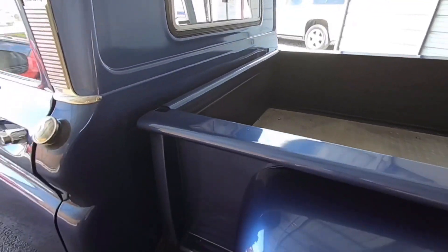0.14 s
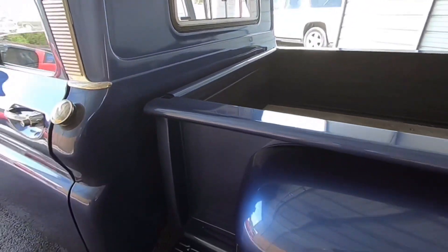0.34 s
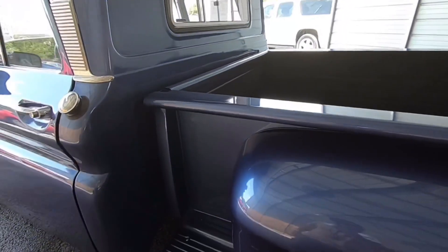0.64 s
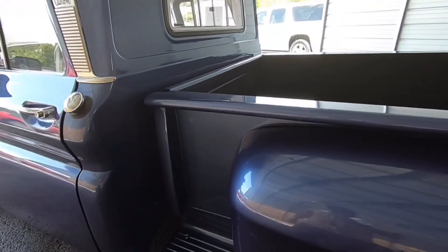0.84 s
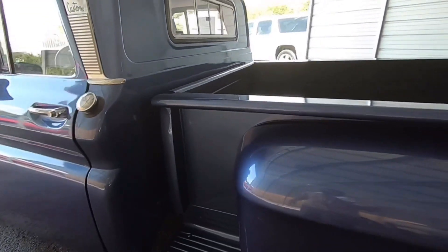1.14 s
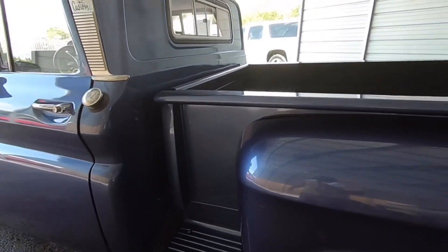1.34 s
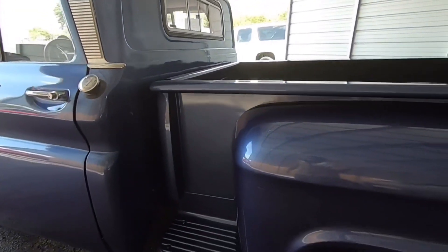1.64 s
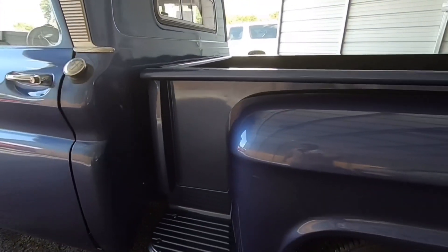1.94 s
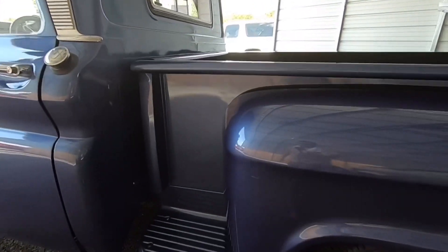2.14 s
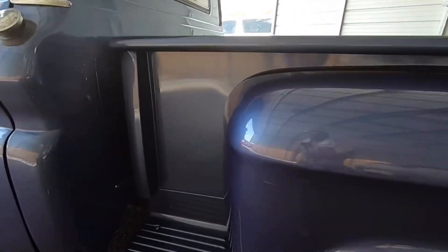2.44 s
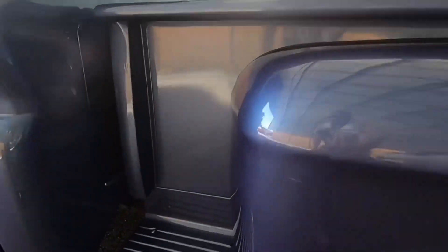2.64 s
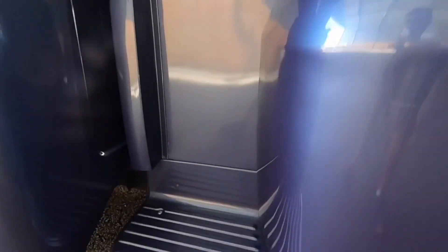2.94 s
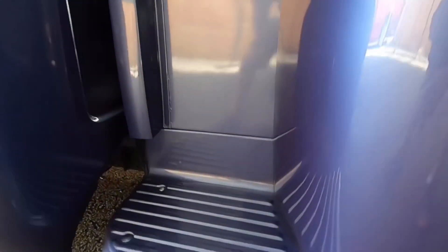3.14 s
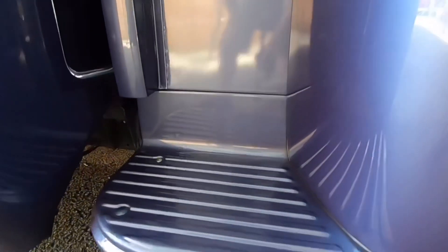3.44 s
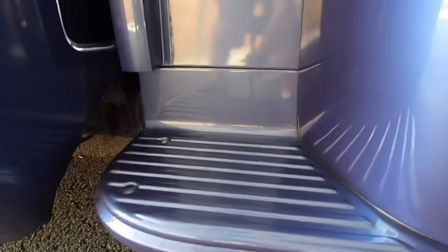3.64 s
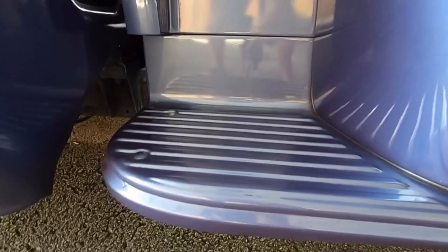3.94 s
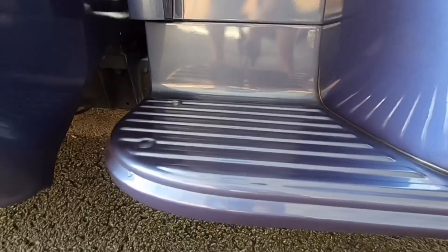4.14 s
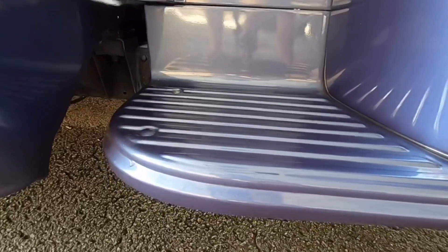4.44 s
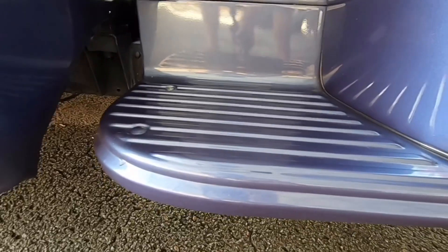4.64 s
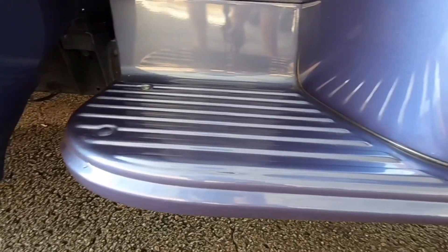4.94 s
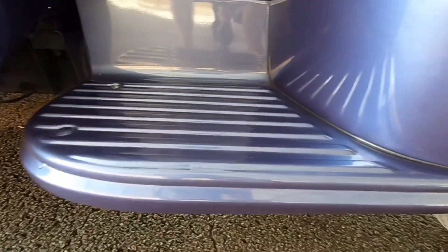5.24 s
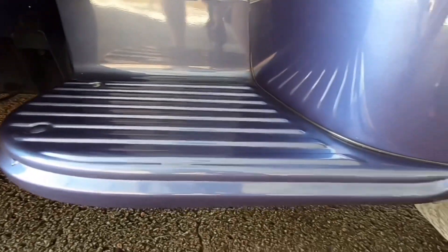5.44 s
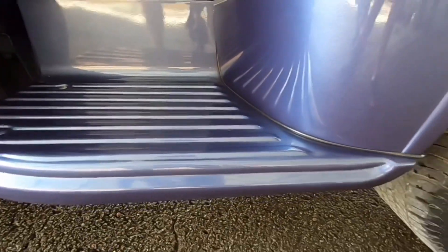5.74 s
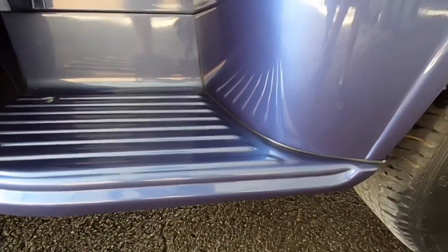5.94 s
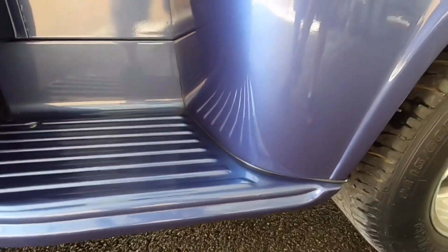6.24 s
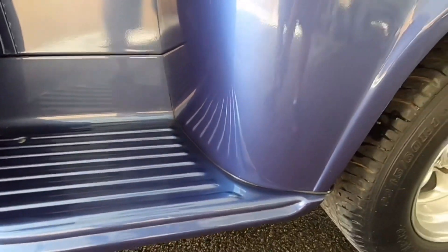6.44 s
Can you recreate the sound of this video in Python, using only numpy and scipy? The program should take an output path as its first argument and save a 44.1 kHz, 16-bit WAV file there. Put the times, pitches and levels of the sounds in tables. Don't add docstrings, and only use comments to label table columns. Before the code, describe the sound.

Hand-held in a covered lot, the sound begins with close, low wind puffs thudding on the microphone for about 0.6 seconds over subdued rushing air. At 0.73 a metallic latch clacks and bounces, its hollow tube ringing. At 1.05 to 1.16 a heavy door slams far off: a quick cluster of blows, loudest near 1.08, with a deep panel boom, loose rattles and a dense roof echo fading by about 2 seconds. Then mains hum around 60 hertz grows, strongest near 5, dipping and swelling as the camera sways. Two fans hold a tone near 295 hertz, beating about eleven times a second, amid steady airy rush and softer gusts. Faint knocks come at 2.5 to 3.1 and 6.2, tiny grit ticks at 2.7 to 3.3. From 5.4 the treble gradually opens and the mono image widens, with low gusts differing left and right until 6.6.

```python
import sys
import numpy as np
from scipy import signal
from scipy.fft import rfft, irfft
from scipy.io import wavfile
from scipy.ndimage import uniform_filter1d

SR = 44100
rng = np.random.default_rng(int(sys.argv[2]) if len(sys.argv) > 2 else 0)


def invert_db(level):
    return 10 ** (np.asarray(level, dtype=float) / 20)


def wrap_up_sound(samples):
    columns = np.atleast_2d(samples).T
    tamed = np.clip(columns, -1, 1)
    steps = np.round(tamed * 32767).astype(np.int16)
    wavfile.write(sys.argv[1], SR, steps)


N = 290343
TIME = np.arange(N) / SR
SHORT = TIME[:2 ** 15]

# t/s, level/dB, tilt about 1 kHz [dB per octave]
SLAM_BLOWS = [
    (1.048, -19, 4),
    (1.059, -7.5, 4),
    (1.064, -4.5, 1),
    (1.076, -4, -4),
    (1.079, -2.5, 2),
    (1.108, -5, -1.5),
    (1.13, -8, -5),
    (1.161, -11.5, 3),
]
# f/Hz, level/dB per Hz
DOOR_COLOUR = [(25, -36), (50, -7), (100, -3), (250, -3.5), (400, -7.5), (900, -11), (1700, -14.5),
               (2700, -25.5), (4600, -36), (8200, -40), (9600, -55), (11500, -49), (14000, -75),
               (15500, -95)]
# f/Hz, level/dB, t60/s, build-up/s
PANEL_MODES = [(46.8, -4, 0.7, 0.025), (85.6, 2.5, 0.6, 0.019), (100.5, -5, 0.56, .02),
               (125.5, -5, 0.55, 0.031), (156.4, -6, 0.45, 0.011), (175.3, -5.5, 0.45, 0.012),
               (241.3, -2, 0.77, .05), (328.6, -5, 0.51, 0.04), (467, -10, 0.56, 0.02),
               (613, -10.5, 0.52, 0.012), (1160, -22, 0.5, .01), (1396, -13, 0.33, 0.0045),
               (1615, -14, 0.4, 0.0071), (1806, -15, 0.56, 0.0092)]
# f/Hz, t60/s
ROOF_DECAY = [(40, 0.7), (150, 0.6), (300, 0.86), (1000, 0.73), (4000, 0.67), (8000, 0.41), (14000, .5)]
# t/s, level/dB, tilt about 1 kHz [dB per octave]
LATCH_BLOWS = [
    (.726, -3.5, 1.2),
    (.733, -0.5, 0.3),
    (.755, 0.5, -0.5),
    (.83, -2.5, 0.029),
    (.91, -7, -0.13),
]
# f/Hz, level/dB, t60/s
LATCH_MODES = [(520, 0.5, 0.47), (540, -2.5, 0.67), (590, -13, 0.44), (716, -17, .5), (888, -11, .6),
               (1080, -6.5, 1), (1113, 1, 0.57), (1300, -2, 0.22)]
# f/Hz, level/dB per Hz
LATCH_COLOUR = [(350, -11), (520, 12.5), (700, 8), (900, 9), (1300, 4), (3000, -1), (5000, -6.5),
                (8300, -33), (9200, -42), (11500, -45), (15000, -77)]
# t/s, peak level/dB, f/Hz, t60/s
RATTLES = [(.73, -31, 797, .15), (.815, -34, 1047, .2), (.83, -33, 562, .15), (.95, -35, 1090, .4),
           (.96, -35, 715, .15), (1.02, -30, 857, .2), (1.057, -25, 978, .35), (1.057, -24, 1405, .1),
           (1.059, -23, 1770, .1), (1.079, -14.5, 1402, .15), (1.079, -20, 1765, .17),
           (1.081, -44, 8300, .06), (1.081, -37, 6860, .06), (1.095, -20, 630, .2), (1.11, -25, 1160, .15),
           (1.08, -27, 2270, .15), (1.09, -27, 2040, .2), (1.1, -34, 2690, .2), (1.085, -30, 3090, .15),
           (1.12, -20, 1360, 0.18), (1.105, -23, 450, .25), (1.2, -27, 1400, .15), (1.165, -17, 250, .2),
           (1.17, -19, 330, .2), (1.275, -20, 235, .1), (1.22, -20, 421, 0.14), (1.268, -32, 1780, .1),
           (1.288, -28, 1800, .08), (1.311, -30, 960, .15), (1.345, -36, 1677, .15)]
# t/s, peak level/dB, f/Hz, t60/s
KNOCKS = [
    (2.53, -32, 825, 0.2),
    (2.56, -30, 850, 0.15),
    (2.715, -27, 674, .12),
    (2.875, -32, 965, 0.16),
    (2.88, -33, 900, .2),
    (3.125, -31, 1365, 0.099),
    (6.165, -35, 1057, 0.22),
]

# t/s, deep level/dB, upper level/dB, length/s
WIND_GUSTS = [(0, -25, -33, .06), (.1, -45, -28, 0.058), (.25, -33, -25.5, 0.11), (.36, -39, -20.5, 0.067),
              (.48, -31, -29, 0.049), (2.09, -26, -38, 0.086), (2.6, -24, -34, .1), (3.02, -42, -30.5, .08),
              (3.28, -33, -45, .08), (3.42, -40, -30, 0.044), (3.72, -38, -31.5, 0.065),
              (3.88, -31, -31.5, .07), (4.04, -45, -40, .04), (4.35, -33, -37, 0.065),
              (4.85, -27.5, -36, .07), (5.1, -34, -32, 0.22), (5.52, -47, -31, .05), (5.75, -33, -50, .05),
              (5.98, -32, -36, .05), (6.17, -29, -35, 0.07), (6.25, -33, -42, .05)]
# t/s, peak level/dB, f/Hz, push +1
PUFFS = [(.005, -17.5, 90, 1), (0.025, -12.5, 145, 1), (0.035, -18, 110, 1), (.059, -23, 60, 1),
         (0.092, -19, 110, -1), (.121, -23, 45, 1), (.156, -24, 90, 1), (.175, -20, 70, 1),
         (.19, -21, 85, 1), (.204, -25, 75, 1), (.221, -24, 55, 1), (0.261, -13.5, 62, -1),
         (.288, -22, 95, -1), (0.304, -14.5, 90, 1), (0.322, -15, 85, 1), (.327, -18, 80, -1),
         (.358, -8.5, 97, -1), (.376, -15, 90, 1), (0.382, -12.5, 99, -1), (.411, -20, 90, -1),
         (.435, -7.5, 90, 1), (.472, -12, 65, 1), (0.491, -12.5, 67, -1), (.503, -18, 70, 1),
         (.569, -25, 80, 1), (.585, -24, 70, -1), (.604, -23, 55, 1), (.656, -22, 70, 1),
         (.703, -18.5, 85, 1), (.731, -24, 55, -1), (1.0865, -10, 200, 1), (1.09, -8, 130, -1),
         (1.108, -12, 120, -1), (1.136, -10, 90, 1), (1.161, -13, 110, 1), (1.287, -12, 75, -1)]
# f/Hz, level/dB per Hz
DEEP_WIND_COLOUR = [(12, -30), (25, 16.0), (45, 11.0), (53, 16), (62, -8.0), (80, -49.5), (300, -110)]
UPPER_WIND_COLOUR = [(55, -25.0), (70, 13.5), (110, 5), (170, -3.5), (330, -22.0), (700, -59.5), (2000, -110)]
FLUTTER_COLOUR = [(120, -30), (200, -0.5), (380, -5.5), (520, -27), (1500, -80)]
# t/s, change/dB, length/s
LULL = [(.8, -7.5, .3)]

# t/s, fast fan level/dB, slow fan level/dB
FAN_LEVELS = [(0, -49, -49.5), (.45, -58, -49.5), (.8, -52, -43.5), (1.0, -36.5, -37.5), (1.6, -36.5, -44),
              (2.22, -32, -40), (2.95, -48, -37), (3.3, -31, -36), (3.5, -28, -47), (3.71, -33, -31.5),
              (4.3, -30.5, -38.5), (4.8, -42, -40), (5.0, -28.5, -43), (5.25, -38.5, -36), (5.5, -35, -44),
              (5.75, -37.5, -40.5), (6.3, -36, -41), (6.58, -31.5, -39)]
FAST_HZ, SLOW_HZ = 74.97, 72.27
# multiple, fast fan level/dB, slow fan level/dB
BLADES = [(3, -50.5, -57.5), (5, -50.5, -51.5), (6, -48.5, -58), (7, -54, -46.5), (8, -52, -51.5),
          (9, -47.5, -55), (10, -61.5, -51.5), (11, -60, -59), (12, -56, -61), (13, -62, -68.5),
          (14, -53.5, -62.5)]
# t/s, change/dB, length/s
LOW_PAIR_CRESTS = [
    (1.1, 6, .4),
    (2.0, 5, 0.48),
    (2.95, 14, 0.43),
    (4.85, 8, .25),
]
# t/s, f/Hz, level/dB, length/s
STREAKS = [(1.93, 505, -50, 0.35), (2.4, 505, -43, 0.24), (3.01, 505, -46.5, 0.28), (3.48, 505, -47.5, .2),
           (4.28, 505, -52.5, .3), (6.4, 505, -54, .25), (2.2, 450, -46, .3), (2.83, 450, -48.5, .3),
           (3.6, 450, -51.5, .3), (2.55, 525, -50, .2), (4.8, 525, -50.5, .15), (5.72, 525, -51.5, 0.33),
           (6.42, 525, -51, .25), (3.3, 577, -47.5, .25), (5.2, 577, -52, .3), (3.0, 600, -45, 0.16),
           (3.75, 600, -48, 0.23), (6.45, 600, -49.5, 0.14), (2.7, 675, -48.5, .45), (3.75, 675, -48, .25),
           (4.24, 675, -48, 0.22), (5.4, 730, -51, 0.28), (6.2, 675, -51, 0.36), (2.0, 900, -52, 0.38),
           (2.9, 1100, -48.5, .3), (3.33, 361, -45.5, .2), (5.2, 361, -49, .45), (5.97, 361, -49.5, 0.27),
           (2.7, 375, -50, 0.33), (4.84, 375, -45.5, 0.26), (5.4, 375, -45, .22), (6.0, 375, -49.5, 0.18),
           (3.6, 225, -42, .15), (4.5, 225, -43, .15), (3.3, 794, -52, .2), (3.2, 866, -52, .2),
           (4.1, 650, -49.5, .25), (2.7, 650, -50, 0.17), (2.4, 660, -53, .2), (4.7, 722, -51, .2),
           (2.8, 240, -46.5, .5), (4.4, 240, -49.5, .5), (2.4, 433, -54, .4), (6.2, 433, -53.5, .3)]

# t/s, level/dB
HUM_LEVEL = [(0, -34), (.25, -39), (.55, -34), (.9, -38.5), (1.5, -30.5), (2.1, -25.5), (2.9, -29.5),
             (3.6, -25.5), (5.0, -21.5), (6.05, -24), (6.58, -26.5)]
HUM_HZ = 60.0
# t/s, change/dB, length/s
SWAYS = [(2.42, 7.5, 0.076), (2.61, 6.5, 0.06), (3.0, 4, 0.072), (3.28, 2, 0.057), (3.4, -8, 0.058),
         (3.78, 7, 0.08), (3.98, 3.5, 0.11), (4.12, -9, 0.062), (4.4, 7.5, 0.06), (4.55, -5, 0.13),
         (4.94, 3, .15), (5.17, -2.5, 0.071), (5.36, 2.5, 0.094), (5.68, -5.5, 0.11), (6.0, 3, 0.14),
         (6.14, -16, 0.042), (6.25, -6, 0.14)]
# t/s, level/dB
SECOND_LEVEL = [(1.6, -48), (1.88, -43), (1.95, -62), (2.06, -38), (2.15, -48), (2.68, -34), (2.85, -42),
                (2.96, -35), (3.37, -37), (3.98, -30), (4.08, -38), (4.44, -29), (4.58, -36), (5.01, -28),
                (5.05, -34), (5.29, -31), (6.55, -38), (6.58, -42)]
SECOND_EARLY = [(1.0, -46)]  # t/s, level/dB
# multiple, level/dB
HUM_UPPER = [
    (3, -52),
    (4, -51.5),
    (6, -54),
]

# t/s, level/dB
AIR_LEVEL = [(0.04, -46.5), (.36, -41.5), (.66, -40.5), (1.62, -42.5), (2.28, -39), (3.1, -38),
             (3.6, -38.5), (4.05, -40.5), (4.5, -41), (4.92, -40), (5.3, -42.5), (5.75, -41.5), (6.24, -42),
             (6.57, -40.5)]
# f/Hz, level/dB per Hz
AIR_COLOUR = [(90, -17.5), (170, 7.5), (400, 0.5), (800, 2.5), (1500, 0.5), (2200, -6.5), (4800, -20.5),
              (5800, -29.5), (8400, -35), (8850, -50), (9200, -44.5), (9800, -53), (11000, -45),
              (13500, -55.5), (15500, -68)]
# t/s, change/dB, length/s
DUCKS = [(1.6, -3.5, 0.35), (4.0, -1, .25), (5.4, -1.2, 0.45), (3.12, 1.5, .12), (2.15, 1, .25),
         (6.5, 1, .2)]
# t/s, peak level/dB
TICKS = [
    (2.675, -62),
    (3.033, -58),
    (3.105, -63),
    (3.15, -63),
    (3.2, -66),
    (3.33, -64),
]
# f/Hz, level/dB per Hz
GRIT_COLOUR = [(2000, -40), (6000, -1), (9000, 0), (12000, -6.5), (14000, -39)]

OPENS_S = 5.41
# f/Hz, level/dB per Hz
HISS_COLOUR = [(1500, -70), (4000, -25), (6000, 6.0), (8600, 4.5), (9400, 2.5), (10400, -4.5),
               (11200, -19), (14500, -19), (16000, -45)]
# t/s, level/dB, length/s
APART_GUSTS = [
    (5.55, -36, 0.065),
    (5.83, -38, 0.061),
    (6.0, -35, 0.043),
    (6.12, -32, 0.057),
    (6.19, -27, 0.057),
    (6.33, -48, 0.074),
    (6.48, -40, 0.057),
    (6.58, -34, .03),
]
# f/Hz, level/dB per Hz
APART_COLOUR = [(300, -21.5), (700, -3), (850, -0.5), (1000, -2.5), (2800, -11.5), (3400, -18), (4060, -31),
                (4500, -15.5), (9300, -19), (10800, -41), (14500, -60.5)]
APART_GUST_COLOUR = [(12, -35), (30, 1.0), (70, -1), (190, -24), (280, -32), (500, -60), (2000, -110)]
TOP_COLOUR = [(11400, -77), (11800, 6.5), (14000, -2), (15000, -53.0)]


def curves(table):
    rows = np.vstack(table)
    return [np.interp(TIME, rows[:, 0], column) for column in rows[:, 1:].T]


def bells(table):
    rows = np.array(table)
    return rows[:, 1:-1].T, np.exp(-((TIME - rows[:, :1]) / rows[:, -1:]) ** 2)


def crests(table):
    db, shape = bells(table)
    return db[0] @ shape


def gusts(table, calm):
    db, shape = bells(table)
    return np.sqrt(invert_db(2 * db) @ shape ** 2 + calm ** 2)


def colour(x, points):
    hz, db = np.transpose(points)
    f = np.maximum(np.fft.rfftfreq(len(x), 1 / SR), 1)
    y = irfft(rfft(x) * invert_db(np.interp(np.log(f), np.log(hz), db)), len(x))
    return y / np.sqrt(np.mean(y ** 2))


def noise(points):
    return colour(rng.standard_normal(N), points)


def walk(rate):
    k = int(SR / rate)
    steps = np.repeat(rng.standard_normal(N // k + 1), k)
    smooth = uniform_filter1d(uniform_filter1d(steps, k), k)[:N]
    return smooth / smooth.std()


def tone(hz, db, wander, flutter_db, rate=2):
    phase = 2 * np.pi * hz * TIME + wander * walk(rate) + 7 * rng.random()
    return np.sqrt(2) * invert_db(db + flutter_db * walk(1.5 * rate)) * np.sin(phase)


def ring(hz, db, t60):
    return invert_db(db - 60 * SHORT / t60) * np.sin(2 * np.pi * hz * SHORT)


def place(x, s):
    return np.pad(x, (int(s * SR), N))[:N]


def around(s, reach):
    return slice(max(int((s - reach) * SR), 0), int((s + reach) * SR))


def roof(points, blows, direct):
    decay_hz, decay_t60 = np.transpose(ROOF_DECAY)
    whole = rfft(colour(rng.standard_normal(len(SHORT)), points))
    octave = np.log2(np.fft.rfftfreq(len(SHORT), 1 / SR) + 1)
    first = blows[0][0]
    start, out = first - .01, 0
    for c in np.arange(4, 15, .5):
        t60 = np.interp(c, np.log2(decay_hz), decay_t60)
        power = 0
        for s, db, tilt in blows:
            t = np.maximum(SHORT + start - s, 0)
            rise = 1 - np.exp(-(t * 2 ** c / 0.95) ** 2)
            echo = invert_db(-120 * t / t60) + direct * np.exp(-t / 0.0016)
            dull_db = 10 * max(c - 12.7, 0) * (s < first + .022)
            band_db = db + tilt * (min(c, 12) - 10) - dull_db
            power = power + invert_db(2 * band_db) * rise * echo
        band = irfft(whole * np.clip(1 - 2 * abs(octave - c), 0, 1), len(SHORT))
        out = out + band * np.sqrt(power)
    return place(out, start)


def slam():
    boom = 0
    for hz, db, t60, build in PANEL_MODES:
        waver = invert_db(4.7 * walk(28)[:len(SHORT)])
        boom = boom + ring(hz, db, t60) * waver * (1 - np.exp(-SHORT / build))
    return invert_db(-16) * roof(DOOR_COLOUR, SLAM_BLOWS, 1.0) + invert_db(-15) * place(boom, 1.074)


def latch():
    waver = invert_db(3.0 * walk(30.6)[:len(SHORT)])
    build = 1 - np.exp(-(SHORT / 0.031) ** 2)
    tube = sum(ring(hz, db, t60) for hz, db, t60 in LATCH_MODES) * waver * build
    return invert_db(-32) * (roof(LATCH_COLOUR, LATCH_BLOWS, 0.3) + invert_db(6.5) * place(tube, .727))


def knocks():
    build = 1 - np.exp(-SHORT / 0.0053)
    out = 0
    for table in (KNOCKS, RATTLES):
        for s, db, hz, t60 in table:
            out = out + place(ring(hz, db, t60) * build, s)
    return out


def wind():
    calm_db = np.array([[-36.5], [-39]])
    deep, upper = gusts(WIND_GUSTS, invert_db(calm_db + crests(LULL)))
    early = np.clip((.6 - TIME) / .1, 0, 1)
    out = deep * invert_db(1.5 * walk(8.3)) * noise(DEEP_WIND_COLOUR)
    out += upper * invert_db(0.5 - 8.6 * early + 1.0 * walk(13)) * noise(UPPER_WIND_COLOUR)
    close = np.clip((.5 - TIME) / .1, 0, 1)
    out += upper * invert_db(-19.0 + 2.6 * walk(28.5)) * close * noise(FLUTTER_COLOUR)
    out = signal.sosfilt(signal.butter(3, 28, "high", fs=SR, output="sos"), out)
    for s, db, hz, sign in PUFFS:
        near = around(s, 1.5 / hz)
        u = (TIME[near] - s) * hz
        out[near] += invert_db(db) * np.sign(sign) * np.cos(2 * np.pi * u) * np.exp(-(u / 0.39) ** 2)
    return out


def fans():
    fast_db, slow_db = curves(FAN_LEVELS)
    held = tone(4 * FAST_HZ, fast_db, .3, 0.29) + tone(4 * SLOW_HZ, slow_db, .3, 0.41)
    low_db = -51 + crests(LOW_PAIR_CRESTS)
    low = sum(tone(2 * hz, low_db, 0.87, 2.5, rate=3.6) for hz in (FAST_HZ, SLOW_HZ))
    weak = 0
    for k, fast, slow in BLADES:
        weak = weak + tone(k * FAST_HZ, fast, 0.85, 4.7, rate=7)
        weak = weak + tone(k * SLOW_HZ, slow, 1.08, 3.5, rate=7)
    approach = np.clip((TIME - .6) / 0.38, .12, 1)
    return held + low + weak * invert_db(curves(AIR_LEVEL)[0] + 31.5) * approach


def streaks():
    stray, flutter, out = 0.85 * walk(6), invert_db(2.8 * walk(9)), np.zeros(N)
    for k, (s, hz, db, length) in enumerate(STREAKS):
        near = around(s, 2.5 * length)
        t = TIME[near]
        shift = k * N // len(STREAKS)
        swell = invert_db(db + 2.5) * np.exp(-((t - s) / length) ** 2)
        phase = 2 * np.pi * hz * t + np.roll(stray, shift)[near]
        out[near] += swell * np.roll(flutter, shift)[near] * np.sin(phase)
    return out


def hum():
    first_db = curves(HUM_LEVEL)[0] + crests(SWAYS)
    second_db = curves([SECOND_EARLY, SECOND_LEVEL])[0] - 0.7 + 0.8 * walk(6)
    phase = 2 * np.pi * HUM_HZ * TIME + 0.29 * walk(2.9)
    locked = np.sqrt(2) * (invert_db(first_db) * np.cos(phase) + invert_db(second_db) * np.cos(2 * phase))
    upper = sum(tone(k * HUM_HZ, db, 0.94, 2.7) for k, db in HUM_UPPER)
    return locked + np.clip(TIME / 6.2, .1, 1) * upper


def air():
    level_db = curves(AIR_LEVEL)[0]
    low_db = np.interp(TIME, [0.58, 1.72], [-4.14, 1.86])
    top_db = 4.5 - 0.7 * (level_db + 40) + .5 * TIME + crests(DUCKS)
    very_top_db = np.interp(TIME, [.3, 2.2], [-4.5, 1.5])
    whole, swell = rfft(noise(AIR_COLOUR)), .5 * walk(3.22)
    octave = np.log2(np.maximum(np.fft.rfftfreq(N, 1 / SR), 1) / 1000)
    out = 0
    for centre in np.arange(-4, 5):
        part = irfft(whole * np.clip(1 - abs(octave - centre), 0, 1), N)
        shift_db = np.clip(-centre / 0.73, 0, 1) * low_db
        shift_db = shift_db + np.clip((centre - 1) / 0.73, 0, 1) * top_db
        shift_db = shift_db + np.clip(centre - 2.5, 0, 1.5) * very_top_db
        out = out + part * invert_db(shift_db + swell + 0.7 * walk(12))
    return out * invert_db(level_db + 3.0)


def ticks():
    grit = colour(rng.standard_normal(len(SHORT)), GRIT_COLOUR)
    return sum(place(invert_db(db - 60 * SHORT / .04) * grit, s) for s, db in TICKS)


def opened_treble():
    shut = np.exp(-np.maximum(TIME - OPENS_S, 0) / 0.43)
    return invert_db(-55.5 - 21 * shut) * noise(HISS_COLOUR) * np.clip((TIME - 5.25) / .15, 0, 1)


def ports():
    gust = gusts(APART_GUSTS, invert_db(-60))[0] * invert_db(2.5 * walk(25)) * noise(APART_GUST_COLOUR)
    parting_db = -19 * np.exp(-((TIME - OPENS_S) / 0.38) ** 2)
    diffuse = invert_db(-47 + parting_db + 3 * (TIME - 6.0)) * noise(APART_COLOUR)
    return (gust + diffuse) * np.clip((TIME - 5.44) / 0.03, 0, 1)


def top_hiss():
    return invert_db(-86.5) * noise(TOP_COLOUR) * np.clip(TIME - 1, 0, 1)


def scene():
    events = slam() + latch() + knocks() + ticks()
    place_tone = fans() + streaks() + hum() + air()
    mid = events + wind() + place_tone + opened_treble()
    return mid + np.array([[1], [-1]]) * (ports() + top_hiss())


def narrow(x):
    low_pass = signal.ellip(8, .1, 40, 13400, fs=SR, output="sos")
    dull = signal.sosfiltfilt(low_pass, x)
    return dull + (x - dull) * np.clip((TIME - 1.6) / .2, 0, 1)


def band_limit(x):
    return signal.sosfilt(signal.butter(12, 15140, fs=SR, output="sos"), x)


def record(dry):
    ceiling = .8
    mix = narrow(ceiling * np.tanh(dry / ceiling))
    return band_limit(mix)


dry = scene()
out = record(dry)
wrap_up_sound(out)
```